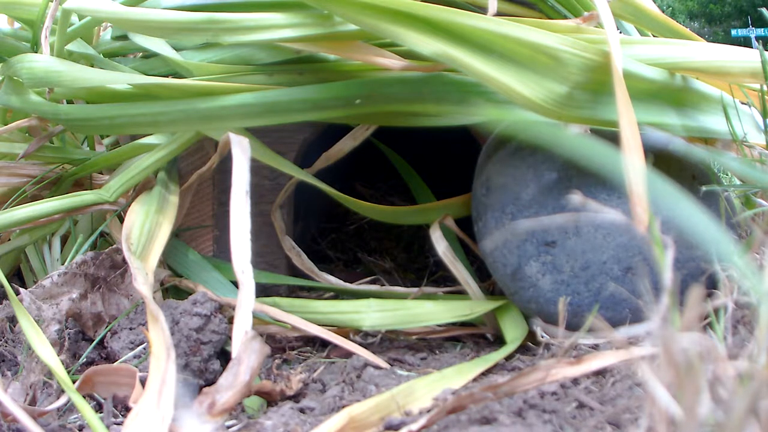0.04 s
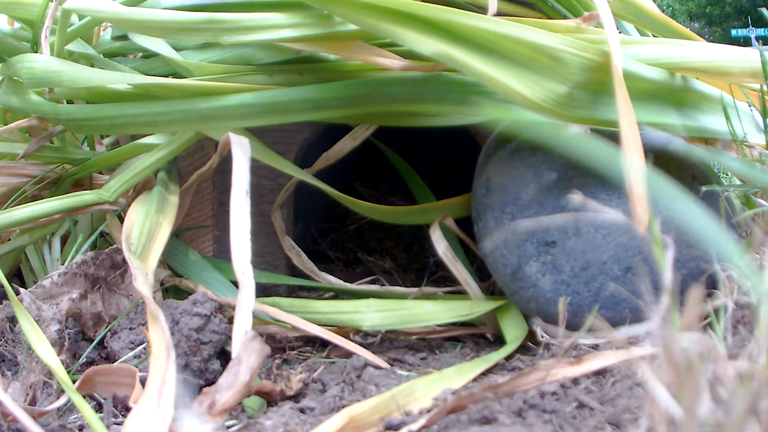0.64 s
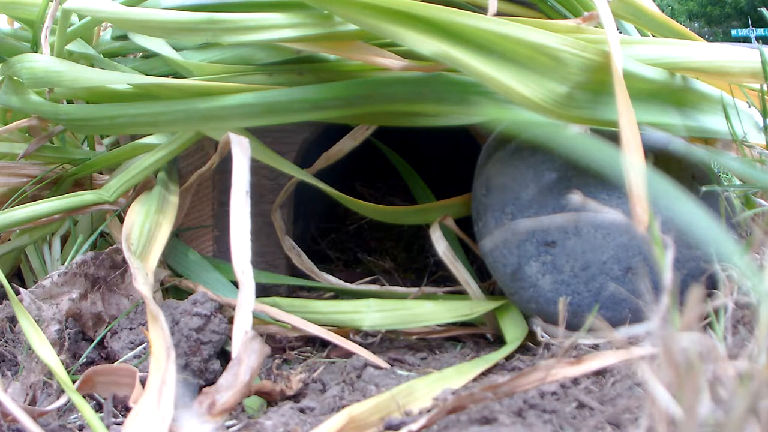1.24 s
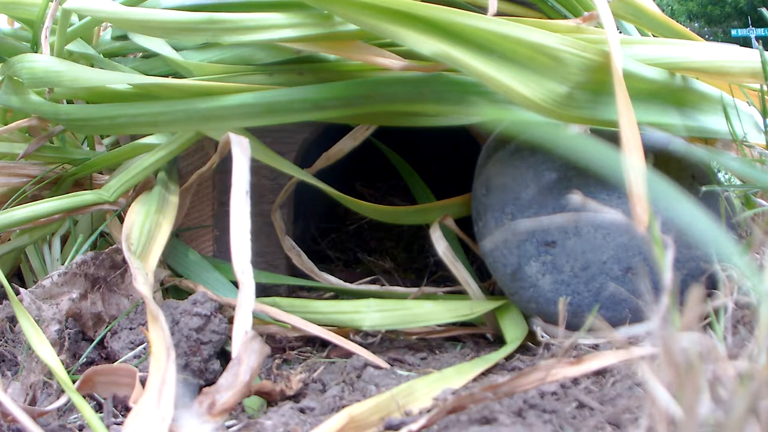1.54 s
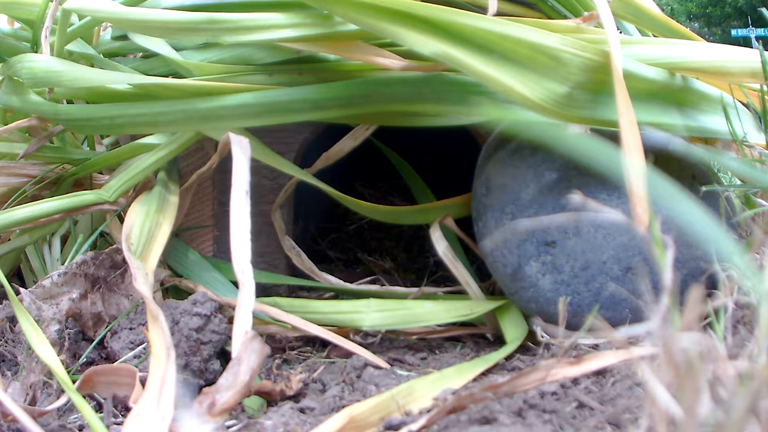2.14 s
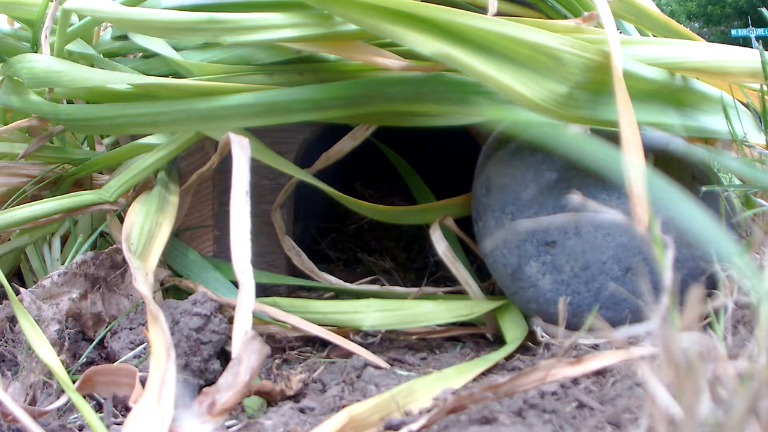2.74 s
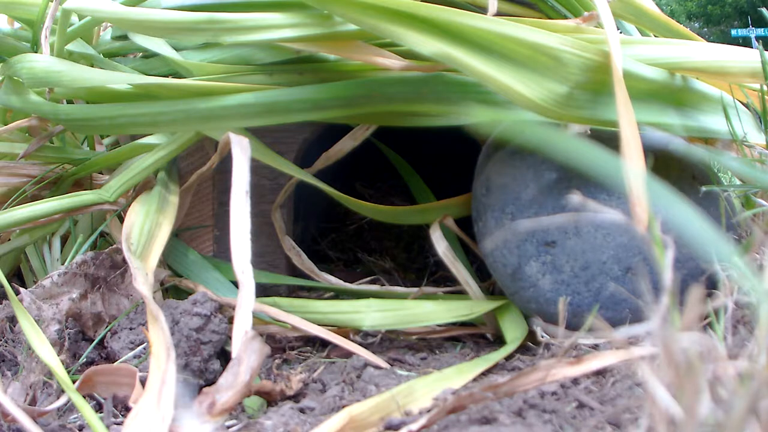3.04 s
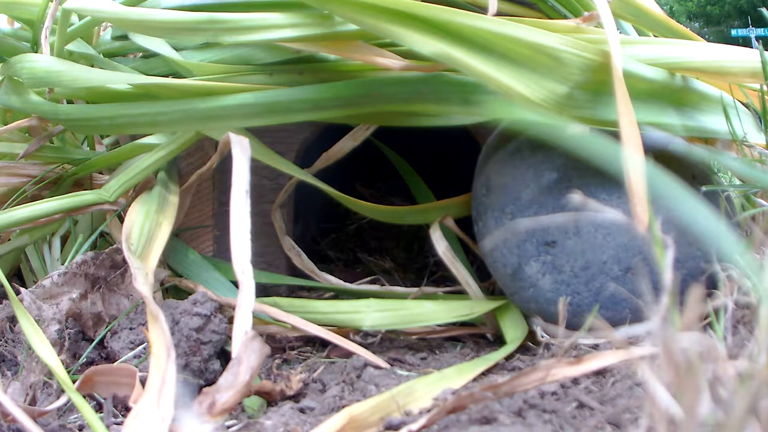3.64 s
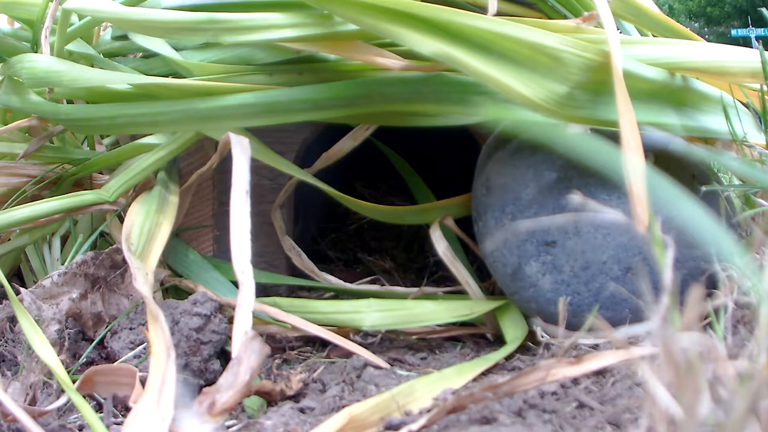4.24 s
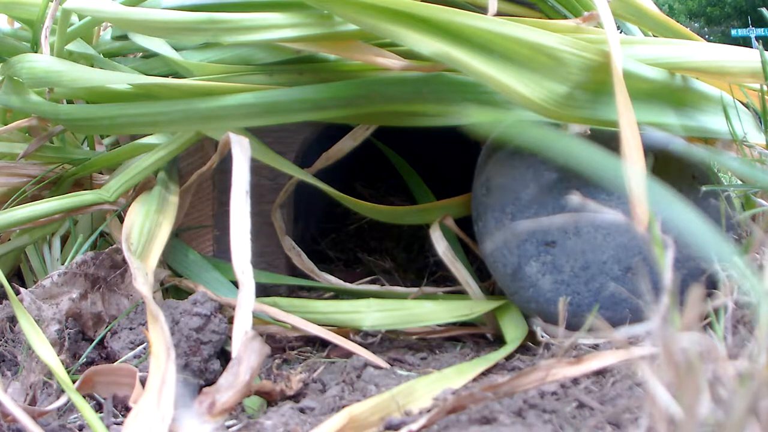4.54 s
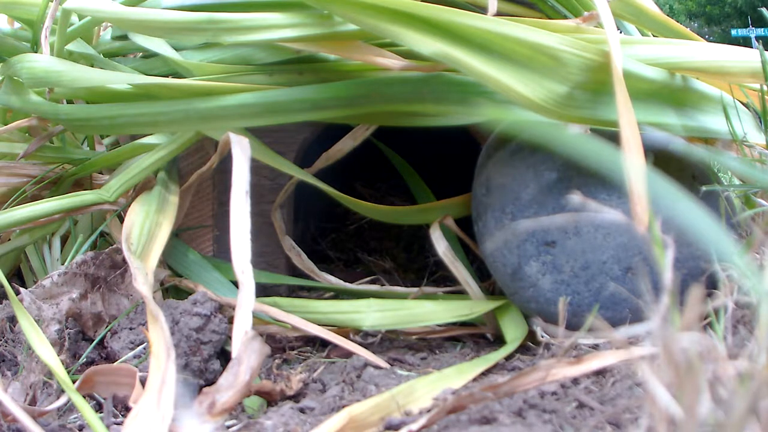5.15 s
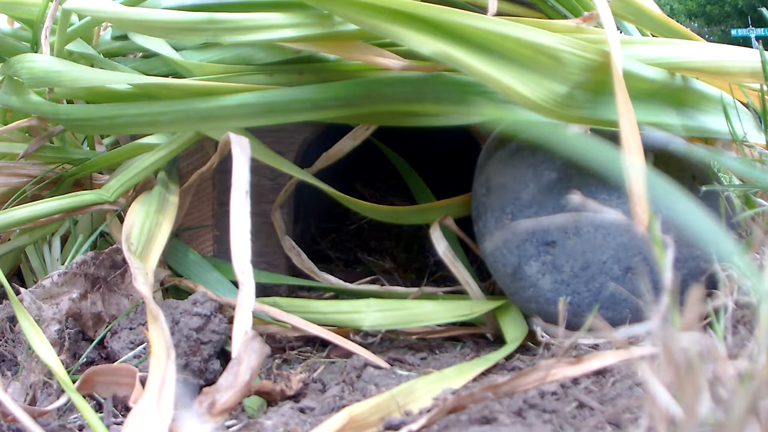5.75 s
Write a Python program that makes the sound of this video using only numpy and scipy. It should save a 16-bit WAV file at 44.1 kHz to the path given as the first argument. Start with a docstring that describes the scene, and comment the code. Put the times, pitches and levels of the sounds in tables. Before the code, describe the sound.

A quiet garden is heard through a small camera near the ground, with steady microphone hiss, low outdoor rumble and a thin electronic whine. Early on, the plastic casing gives one sharp click. A light breeze then swells through long leaves and dies away, while a far bird pipes a few faint notes. A distant engine speeds up and drops back, and a low traffic drone rises slightly near the end.

```python
"""A quiet garden

A small mono camera lies near the ground; its plastic body rings with one sharp click, later a tiny one.
A breeze swells through long leaves and dies away, a far engine speeds up and drops back, and a far bird
pipes faintly. Beneath lie a traffic drone, outdoor rumble, microphone hiss and electronic whine and hum."""
import sys
import numpy as np
from scipy import signal
from scipy.fft import rfft, irfft, next_fast_len
from scipy.io import wavfile
from scipy.ndimage import uniform_filter1d, map_coordinates

SR = 44100
rng = np.random.default_rng(int(sys.argv[2]) if len(sys.argv) > 2 else 0)


def materialize(psi):
    """Save the field psi as 16-bit PCM at rate SR to the path in sys.argv[1].

    A 1-D psi becomes a single channel; in a 2-D psi each row is a channel.
    """
    bounded = np.clip(np.atleast_2d(psi).T, -1, 1)
    quanta = np.round(bounded * 32767).astype(np.int16)
    wavfile.write(sys.argv[1], SR, quanta)


N = 259308


# Resonant modes of the camera body: pitch_hz, level_db, t60_s
BODY_MODES = [(670, -15, 0.0055), (982, -25, 0.03), (1310, -23.5, 0.024), (1630, -4, 0.012),
              (1950, -24, 0.016), (2545, -16, 0.012), (3090, -11.5, 0.0067), (3490, -25, 0.011),
              (4290, -11.5, 0.0032), (5100, -27, 0.0027), (7400, -20, .005), (9200, -19.5, 0.01)]
# Snaps in the body: start_s, gain_db
CLICKS = [(0.7347, -6.5), (4.032, -40)]
def click(push_db=-11, push_s=0.0035, crack_db=-21.5, crack_t60_s=0.0042, rise_s=0.0001):
    """Impulse response: a snap in plastic gives damped modes, a crack and one low push of pressure."""
    t = np.arange(SR // 10) / SR
    ring = sum(amp(db - 60 * t / t60) * np.sin(2 * np.pi * hz * t) for hz, db, t60 in BODY_MODES)
    push = amp(push_db) * (1 - t / push_s) * np.exp(-t / push_s)
    crack = amp(crack_db - 60 * t / crack_t60_s) * rng.standard_normal(len(t))
    snap = (ring + push + crack) * (1 - np.exp(-t / rise_s))
    out = np.zeros(N + SR)
    for start_s, gain_db in CLICKS:
        out[round(start_s * SR):][:len(t)] += amp(gain_db) * snap
    # the casing passes 14 dB less above 5600 Hz
    return filtered(out[:N], lambda hz: amp(-14 * (1 - 1 / (1 + (hz / 5600) ** 20))))


# Spectra of the leaves' rustle and of its bright edge: frequency_hz, relative_db
RUSTLE_SPECTRUM = [(500, -34.5), (900, -16), (1070, -8), (1230, -12.5), (1400, -4.5), (1550, -6.5),
                   (1740, 0.5), (1900, -1.4), (2060, -0.5), (2250, -8.5), (2500, -4), (2800, -6.5),
                   (4000, -16.5), (9000, -35.5)]
EDGE_SPECTRUM = [(1000, -22), (1700, -12), (2250, 5.5), (2600, 2.5), (3200, 4), (4100, 1.5), (4900, -6),
                 (6500, -10.5), (9600, -29.5)]
# Puffs of air: crest_s, half_width_s, level_db, tilt_db_per_octave
PUFFS = [(2.47, 0.38, -59.5, -1), (3.86, 0.48, -59.5, 2.2), (4.67, 0.38, -55.5, -4)]
def breeze(start_s=1.34, end_s=5.89, attack_s=0.85, release_s=0.74, lull_share=0.22):
    """Flow noise: leaves rustle as the air swells; each puff adds an edge of its own brightness."""
    t = np.arange(N) / SR
    rise = 1 - np.exp(-np.maximum(t - start_s, 0) / attack_s)
    fall = 1 - np.exp(-np.maximum(end_s - t, 0) / release_s)
    swell = lull_share + (1 - lull_share) * rise * fall
    rustle = amp(-55.5) * shaped_noise(RUSTLE_SPECTRUM, patchy_db=1.0)
    edge = amp(-62) * shaped_noise(EDGE_SPECTRUM, patchy_db=3.0)
    out = swell * (rustle + edge)
    for crest_s, half_width_s, level_db, tilt in PUFFS:
        tilted = [(hz, db + tilt * np.log2(hz / 3000)) for hz, db in EDGE_SPECTRUM]
        envelope = amp(level_db) * np.exp(-((t - crest_s) / half_width_s) ** 2)
        out += envelope * shaped_noise(tilted, patchy_db=-1.0)
    return out


# Hollow band of the rustle: time_s, centre_hz, level_db
SOUGH_TRACK = [(0, 1800, -89), (1.1, 1800, -77), (1.4, 1840, -62.5), (1.95, 2047, -67.5), (2.5, 2074, -69),
               (4.15, 2250, -75), (4.6, 2350, -61), (5.05, 2200, -67), (5.45, 1950, -78)]
def sough(width_hz=430):
    """Narrowband flow noise: a hollow band leads the rustle in and climbs with the flow."""
    centre_hz, level_db = curves(SOUGH_TRACK)
    return amp(level_db) * noise_band(centre_hz, width_hz)


# Exhaust of the far engine: time_s, firing_hz, first_harmonic_db, second_harmonic_db
EXHAUST_TRACK = [(0, 79.2, -69.5, -86), (1.7, 75.6, -70, -76), (2.25, 75, -62, -67.5), (2.42, 74, -69, -63),
                 (2.56, 77.2, -62, -58.5), (2.85, 81.72, -59.5, -62), (3.25, 87.3, -61, -58.5),
                 (3.64, 93.6, -59, -60.5), (3.95, 84.8, -60.5, -62.5), (4.2, 78.5, -63.5, -62.5),
                 (4.35, 77.4, -67, -67.5), (4.6, 81, -64.5, -64), (5, 82.5, -75, -73),
                 (5.25, 84.9, -63, -59.5), (5.45, 84.7, -73, -72), (5.88, 85, -72, -70)]
def engine():
    """Periodic firing makes a harmonic series, of which only the lowest two tones carry this far."""
    firing_hz, first_db, second_db = curves(EXHAUST_TRACK)
    phase = phase_of(firing_hz * (1 + 0.0032 * wobble(24)))
    harmonics = amp(first_db) * np.sin(phase) + amp(second_db) * np.sin(2 * phase)
    return np.sqrt(2) * amp(0.7 * wobble(8.7)) * harmonics


# Notes of the far bird: start_s, length_s, pitch_hz, gain_db
BIRD_NOTES = [(1.55, 0.37, 2480, -66), (2.63, 0.15, 2520, -59), (2.825, 0.11, 2490, -58.5),
              (3.273, 0.14, 2470, -60), (3.94, 0.14, 2500, -55)]
def bird(blur_hz=18, scatter_hz=120, scatter_db=-4):
    """Scattering: soft notes of level pitch blur slightly on their way through the trees."""
    t = np.arange(N) / SR
    out = np.zeros(N)
    for start_s, length_s, pitch_hz, gain_db in BIRD_NOTES:
        progress = np.clip((t - start_s) / length_s, 0, 1)
        envelope = np.sqrt(np.abs(np.sin(np.pi * progress)))
        direct = np.sin(phase_of(pitch_hz + blur_hz * wobble(150)))
        scattered = amp(scatter_db) * noise_band(pitch_hz, scatter_hz)
        out += amp(gain_db) * envelope * (direct + scattered)
    return out


# Drone of far traffic: time_s, level_db
DRONE_LEVELS = [(0, -74.5), (3.7, -69), (4.25, -60.5), (4.7, -59), (5.2, -61.5), (5.88, -65)]
def traffic(pitch_hz=75.8):
    """Random modulation: far traffic holds one low note, unsteady in level and pitch."""
    level_db, = curves(DRONE_LEVELS)
    envelope = np.sqrt(2) * amp(level_db + 2.0 * wobble(5))
    return envelope * np.sin(phase_of(pitch_hz * (1 + 0.0148 * wobble(8))))


# Whine of the camera: time_s, centre_hz
WHINE_TRACK = [(0, 5190), (.5, 5280), (.72, 5430), (.95, 5520), (1.2, 5370), (1.45, 5300), (1.8, 5480),
               (2.8, 5335), (4.6, 5400), (5.25, 5530), (5.88, 5330)]
def electronics(frame_hz=30.04, sag_hz=340, overshoot_hz=290, whine_db=-63.5, hum_db=-67.0):
    """Frequency modulation: over a hum, a whine sags between picture frames, overshoots and settles."""
    t = np.arange(N) / SR
    frame_phase = (t - 0.0148) * frame_hz % 1
    pause_share, settle_share = 0.25, 0.2
    in_pause = frame_phase < pause_share
    settling_hz = overshoot_hz * np.exp(-(frame_phase - pause_share) / settle_share)
    load = 1 + 0.35 * wobble(30)
    pull_hz = uniform_filter1d(load * np.where(in_pause, -sag_hz, settling_hz), size=220)  # 5 ms glide
    waver_hz = 55 * wobble(500) + 90 * wobble(120) + 40 * wobble(20)
    centre_hz, = curves(WHINE_TRACK)
    dip_db = uniform_filter1d(-2.8 * in_pause, size=220)
    whine = amp(whine_db + dip_db + wobble(60)) * np.sin(phase_of(centre_hz + pull_hz + waver_hz))
    hum = amp(hum_db) * np.sin(2 * np.pi * 2 * frame_hz * t)
    return whine + hum


# Spectra of outdoor rumble and microphone hiss: frequency_hz, relative_db
RUMBLE_SPECTRUM = [(8, -3), (30, 0), (50, 1), (80, -2), (120, -3.5), (200, -6.5), (260, -8.5), (340, -9),
                   (420, -12.5), (600, -15), (850, -19), (1500, -23.5), (4000, -45)]
HISS_SPECTRUM = [(100, -9.5), (600, -7.5), (900, -2), (1350, -1), (1850, 3.5), (2150, 0.5), (2400, 2.5),
                 (3000, -1.3), (3700, -1.5), (4400, 0.1), (4800, -1.5), (5800, -0.3), (6350, -3.5),
                 (6850, -0.9), (7300, -6.5), (9600, -3.5)]
# Strength of the hiss: time_s, level_db
HISS_LEVELS = [(0, -56), (1, -55.5), (2.3, -54), (3.4, -54), (3.95, -53), (4.25, -55.5), (5.88, -56)]
def noise_floor(rumble_start_db=-56.5, growth_db_per_s=0.236):
    """Broadband noise: a slowly growing distant rumble adds to the microphone's own hiss."""
    rumble_db = rumble_start_db + growth_db_per_s * np.arange(N) / SR
    hiss_db, = curves(HISS_LEVELS)
    rumble = amp(rumble_db) * shaped_noise(RUMBLE_SPECTRUM, patchy_db=0.72)
    hiss = amp(hiss_db) * shaped_noise(HISS_SPECTRUM, patchy_db=1.2)
    return rumble + hiss


def shaped_noise(spectrum, patchy_db):
    """Spectral shaping: noise of rms 1, with patches of random gain in time and frequency."""
    bins = signal.stft(rng.standard_normal(N), nperseg=512)[2]
    patches = uniform_filter1d(rng.standard_normal(bins.shape), size=4, axis=0)
    patches = uniform_filter1d(patches, size=14, axis=1)
    noise = signal.istft(bins * amp(patchy_db * unit(patches)), nperseg=512)[1][:N]
    knots_hz, db = np.transpose(spectrum)
    return unit(filtered(noise, lambda hz: amp(np.interp(np.log(hz + 1), np.log(knots_hz), db))))


def noise_band(centre_hz, width_hz):
    """Quadrature modulation: narrowband noise of rms 1 around a centre that may move."""
    phase = phase_of(centre_hz * np.ones(N))
    return unit(wobble(width_hz) * np.cos(phase) + wobble(width_hz) * np.sin(phase))


def filtered(x, response):
    """Linear filtering: the spectrum of x times a frequency response."""
    size = next_fast_len(N + SR // 2)
    return irfft(rfft(x, size) * response(np.fft.rfftfreq(size, 1 / SR)), size)[..., :N]


def wobble(rate_hz):
    """Spline interpolation: a smooth curve through rate_hz random knots a second."""
    knots = rng.standard_normal(int(N * rate_hz / SR) + 4)
    return map_coordinates(knots, [np.arange(N) * rate_hz / SR])


def curves(rows):
    """Linear interpolation: one value per sample for each column after the time."""
    time_s, *columns = np.transpose(rows)
    return [np.interp(np.arange(N) / SR, time_s, column) for column in columns]


def phase_of(hz):
    """Phase is the running integral of frequency."""
    return 2 * np.pi * np.cumsum(hz) / SR


def amp(db):
    """Decibels to amplitude ratio."""
    return 10 ** (np.asarray(db) / 20)


def unit(x):
    """Normalisation to rms 1."""
    return x / np.sqrt(np.mean(x ** 2) + 1e-20)


def scene():
    """Superposition: all sources add in one signal, which feeds both channels."""
    mono = noise_floor() + electronics() + breeze() + sough() + engine() + traffic() + bird() + click()
    return np.array([mono, mono])


def record(dry):
    """Band limiting: the camera notches out a band near 8 kHz and passes nothing above 9.7 kHz."""
    notch = lambda hz: 1 - np.exp(-((hz - 7930) / 360) ** 4)
    return filtered(dry, lambda hz: notch(hz) * (hz < 9700))


dry = scene()
out = record(dry)
materialize(out)
```